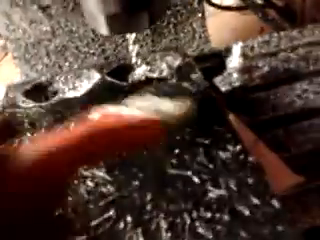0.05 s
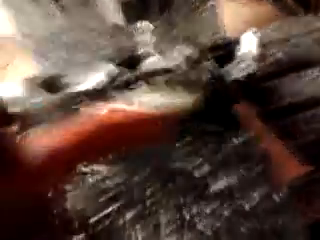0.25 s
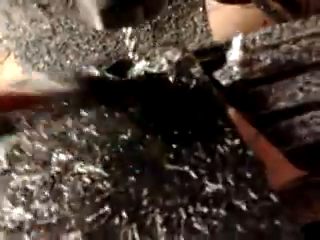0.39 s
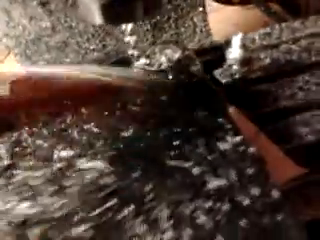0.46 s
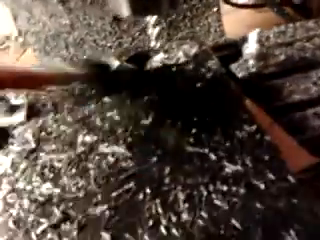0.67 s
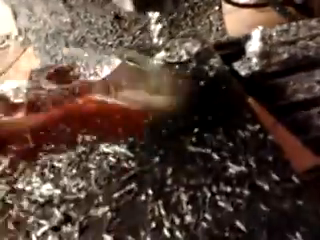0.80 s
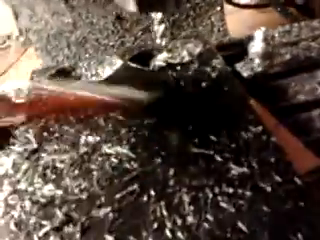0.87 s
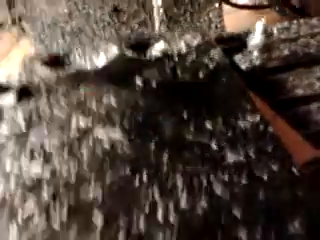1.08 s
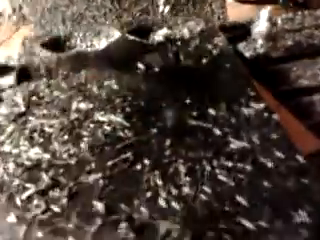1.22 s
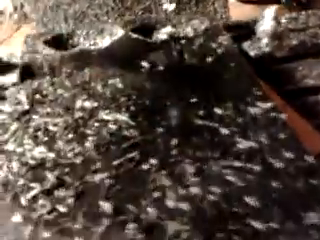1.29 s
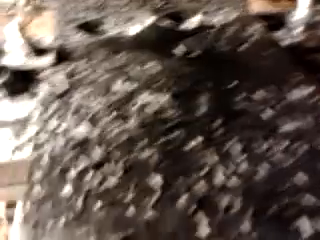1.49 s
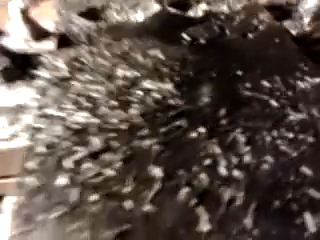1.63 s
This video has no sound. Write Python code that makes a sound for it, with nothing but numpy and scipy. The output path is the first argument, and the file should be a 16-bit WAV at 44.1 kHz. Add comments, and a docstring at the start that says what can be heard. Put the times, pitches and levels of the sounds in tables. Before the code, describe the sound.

Quick close brush strokes sweep metal shavings and something snaps while a milling machine idles.

```python
"""A brush swishes metal chips off the work, close to the microphone, over the hum and gear whine of a
small idling milling machine. There are four quick strokes, the first trailing off in a light flick.
Between the first two, something hard catches with one sharp snap that overloads the microphone,
then chatters briefly as it sticks and slips. At the end the camera is moved and rumbles softly."""
import sys
import numpy as np
from scipy.fft import rfft, irfft, next_fast_len
from scipy.io import wavfile
from scipy.ndimage import map_coordinates

SR = 44100
rng = np.random.default_rng(int(sys.argv[2]) if len(sys.argv) > 2 else 0)


def to_wav(sig):
    """Store sig (one row per channel, or 1-D mono) as 16-bit WAV at the path in sys.argv[1].

    Samples outside -1..1 are clipped; the rate is SR.
    """
    pcm = np.clip(np.atleast_2d(sig), -1, 1) * 32767
    pcm = np.round(pcm).astype(np.int16)
    wavfile.write(sys.argv[1], SR, pcm.T)  # frames by channels


N = 72765

# gear tones, then further tones of the same whine above 2.5 kHz: f/Hz, relative level/dB
GEAR_TONES = [(742.9, -62), (769.8, -63.5), (958.2, -60), (990.5, -60.5), (1384, -73.5), (1491, -72),
              (1540, -69.5), (1809, -65.5), (1868, -66.5), (1976, -68), (2196, -71), (2234, -62),
              (2283, -69), (2304, -58)]
UPPER_GEAR_TONES = [(2638, -67.5), (3187, -71.5), (3295, -68.5), (3515, -70.5), (3623, -67), (3736, -68),
                    (3941, -67)]
# running noise of the machine: f/Hz, relative density/dB
WHIRR_SPECTRUM = [(25, -2), (45, -3), (75, -0.5), (170, -4.5), (345, -1), (560, -7.5), (800, -6.5),
                  (1050, -5.5), (1300, -9.5), (1900, -5.5), (2350, -5), (2850, -13), (3300, -13),
                  (3900, -11), (4300, -14), (5300, -12), (7000, -11.5), (9500, -15.5), (11500, -17),
                  (15800, -17.5)]
# camera moves: start/s, fullest/s, end/s, level/dB, upper edge/Hz
CAMERA_MOVES = [(1.253, 1.53, 1.994, -62, 45), (1.621, 1.64, 1.68, -44.5, 457)]
# modes struck by the snap: f/Hz, relative level/dB, t60/s
SNAP_MODES = [(694, -17, 0.017), (1055, -18.5, 0.02), (1735, -12, 0.027), (2517, -2, 0.0081),
              (3682, 3.5, 0.0056), (4926, 17.5, 0.0029), (5513, -0.5, 0.0085), (6940, -3, 0.0054),
              (8705, 4.5, 0.0043), (10550, -0.5, 0.0056)]
# noise ringing on after the snap: f/Hz, relative density/dB
TAIL_SPECTRUM = [(60, 3.5), (300, 1.5), (600, -13), (1000, -30), (1400, -2), (2300, 5), (3200, -4.5),
                 (5000, 5), (7400, 0), (10000, -2), (11500, -6), (13000, -31.5), (15800, -18.5)]
# noise of the hard contact, in both crack and chatter: f/Hz, relative density/dB
CONTACT_SPECTRUM = [(60, -10), (300, -3), (520, 1.5), (750, 1.5), (1020, 6), (1400, -4.5), (2300, -2),
                    (3000, -7.5), (4800, 1), (6000, -2.5), (7400, -4), (8400, -22), (9200, -6),
                    (11000, -9.5), (12500, -25), (15800, -33.5)]
# tones of the sticking and slipping contact: f/Hz, relative level/dB
JUDDER_TONES = [(505, -5.5), (1010, -8), (1700, -17), (2390, -11.5), (8320, -9.5)]
# strokes and flick: start/s, full/s, easing/s, end/s, level/dB, hollow ring/Hz, ring re rub/dB
BRUSH_STROKES = [(-.022, 0.035, 0.049, 0.12, -39, 1434, -9), (0.102, 0.124, 0.12, 0.15, -51, 1430, -5.5),
                 (0.24, 0.299, 0.34, 0.386, -39.5, 1460, -8), (0.504, 0.59, 0.61, 0.657, -38, 1420, -9),
                 (0.811, 0.883, 0.86, 0.918, -38, 1365, -6.5)]
# bristles and chips on the steel: f/Hz, relative density/dB
SWISH_SPECTRUM = [(100, -26), (330, -2), (600, -10), (1100, -11), (1750, -6), (2050, -2.5), (2350, -7),
                  (2750, -7), (3500, -1), (4000, 0), (4350, -8), (5100, 3), (6100, 1), (7100, -4.5),
                  (8800, -0.5), (11500, -1), (12900, -6), (15500, -8.5)]
# resonances of the brushed steel: f/Hz, width/Hz, relative level/dB
STEEL_RESONANCES = [(1810, 120, -0.5), (2394, 100, -1.5), (3840, 664, -1.5), (5900, 510, -0.5),
                    (6400, 570, 3.5), (9300, 430, -12), (10800, 490, -10)]

TIME = np.arange(N) / SR


def amp(db):
    """Decibels to gain."""
    return 10 ** (np.asarray(db) / 20)


def unit(x):
    """Scale to rms 1."""
    return x / np.sqrt(np.mean(x ** 2) + 1e-20)


def noise():
    """White noise."""
    return rng.standard_normal(N)


def wobble(per_s):
    """A smooth curve through per_s random values a second."""
    return map_coordinates(rng.standard_normal(int(N * per_s / SR) + 4), [TIME * per_s])


def swell(start, full, easing, end):
    """A rounded rise, a hold and a fall."""
    return np.sin(np.pi / 2 * np.interp(TIME, [start, full, easing, end], [0, 1, 1, 0]))


def filtered(x, response):
    """x through a filter whose gain is response(f/Hz)."""
    size = next_fast_len(N + SR // 2)
    return irfft(rfft(x, size) * response(np.fft.rfftfreq(size, 1 / SR)), size)[..., :N]


def coloured(x, spectrum):
    """x shaped by a spectrum of (f/Hz, level/dB) points, at rms 1."""
    hz, db = np.transpose(spectrum)
    return unit(filtered(x, lambda f: amp(np.interp(np.log(f + 1), np.log(hz + 1), db))))


def resonating(hz, width_hz):
    """Noise of rms 1 in one resonance."""
    return unit(filtered(noise(), lambda f: 1j * f * width_hz / (hz ** 2 - f ** 2 + 1j * f * width_hz)))


def idling_machine():
    """The bed: a throbbing hum and gear tones follow one shaft, and a whirr pulses with the motor."""
    motor_hz, speed_wander = 107, 0.00069
    throb_period_s, throb_peak_s = 0.293, 0.32
    shaft_time = np.cumsum(1 + speed_wander * wobble(per_s=14.54)) / SR
    motor = np.sin(2 * np.pi * motor_hz * shaft_time)
    throb = 1 + 0.36 * np.cos(2 * np.pi * (TIME - throb_peak_s) / throb_period_s)
    hum = amp(-57.5) * motor * throb
    whirr = amp(-51.5) * coloured(noise(), WHIRR_SPECTRUM) * (1 + 0.11 * motor)
    whine = np.zeros(N)
    for hz, db in [*GEAR_TONES, *UPPER_GEAR_TONES]:
        flutter_db = 1.1 * wobble(per_s=12.52)
        whine += amp(db + flutter_db) * np.sin(2 * np.pi * (hz * shaft_time + rng.random()))
    return whirr + np.sqrt(2) * (hum + amp(1) * whine)


def camera_handling():
    """Handling noise: dull rubbing reaches the microphone as the camera moves."""
    rumble = np.zeros(N)
    for start, fullest, end, db, edge_hz in CAMERA_MOVES:
        rub = unit(filtered(noise(), lambda f: 1 / (1 + (f / edge_hz) ** 3)))
        rumble += amp(db) * swell(start, fullest, fullest, end) * rub
    return rumble


def chatter(snap_s):
    """Just after the snap the contact scrapes and judders, weakens from halfway, and stops dead."""
    span_s = (0.2075, 0.2105, 0.2255, 0.2278)
    fade_db_per_s = 462
    scrape = coloured(noise(), CONTACT_SPECTRUM)
    judder = sum(amp(db) * np.sin(2 * np.pi * hz * (TIME - snap_s)) for hz, db in JUDDER_TONES)
    fade_db = fade_db_per_s * np.maximum(TIME - np.mean(span_s), 0)
    return swell(*span_s) * amp(-20.5 - fade_db) * (scrape + judder)


def snap(snap_s):
    """One hard contact close by: a crack, ringing modes, a low knock and thump, and a faint tail."""
    age = np.maximum(TIME - snap_s, 0)

    def decay(db, t60):
        return amp(db - 60 * age / t60)

    def mode(hz, db, t60):
        return decay(db, t60) * np.sin(2 * np.pi * hz * age)

    ring = amp(0.5) * sum(mode(*row) for row in SNAP_MODES)
    knock = mode(hz=173, db=-24.5, t60=0.0078)
    thump = -mode(hz=45.83, db=-29.5, t60=0.18)
    crack = decay(db=-3, t60=0.006) * coloured(noise(), CONTACT_SPECTRUM)
    tail = decay(db=-24, t60=0.12) * coloured(noise(), TAIL_SPECTRUM)
    return ring + knock + thump + (age > 0) * (crack + tail)


def brush():
    """In the foreground, bristles hiss under uneven pressure, tumble chips and make the steel ring."""
    chips_per_s = 3000
    chips = unit((rng.random(N) < chips_per_s / SR) * noise())
    swish = coloured(noise() + amp(-1) * chips, SWISH_SPECTRUM)
    steel = sum(amp(db) * resonating(hz, width_hz) for hz, width_hz, db in STEEL_RESONANCES)
    rub = unit(swish + amp(-10.5) * steel)
    strokes = np.zeros(N)
    for *span_s, db, ring_hz, ring_db in BRUSH_STROKES:
        hollow_ring = amp(ring_db) * resonating(ring_hz, width_hz=130)
        strokes += amp(db) * swell(*span_s) ** 1.5 * (rub + hollow_ring)
    pressure_db = 1.4 * wobble(per_s=83)
    return strokes * amp(pressure_db)


def scene():
    """At the milling machine, everything heard in mono from one close position."""
    snap_s = 0.2047
    return (idling_machine() + camera_handling() + chatter(snap_s) + snap(snap_s) + brush())[None]


def record(dry):
    """The close microphone overloads on the snap; the top of its band is cut off steeply."""
    overload_level, top_hz = 0.62, 16000
    saturated = dry / (2 + np.abs(dry / overload_level) ** 10) ** (1 / 10)
    return filtered(saturated, lambda f: 1 / (1 + (f / top_hz) ** 120))


dry = scene()
out = record(dry)
to_wav(out)
```